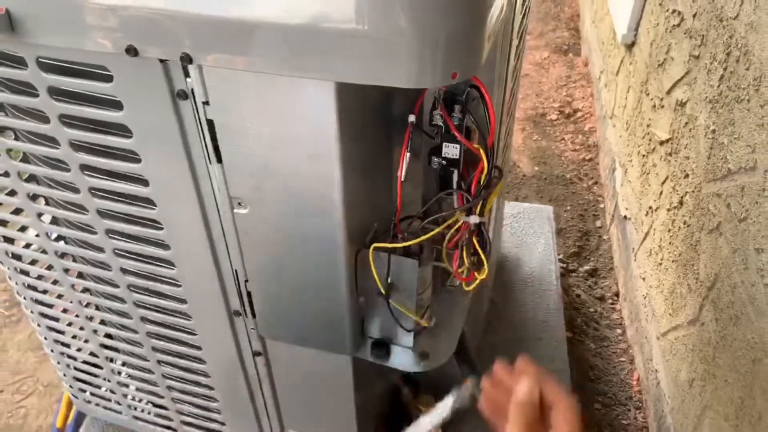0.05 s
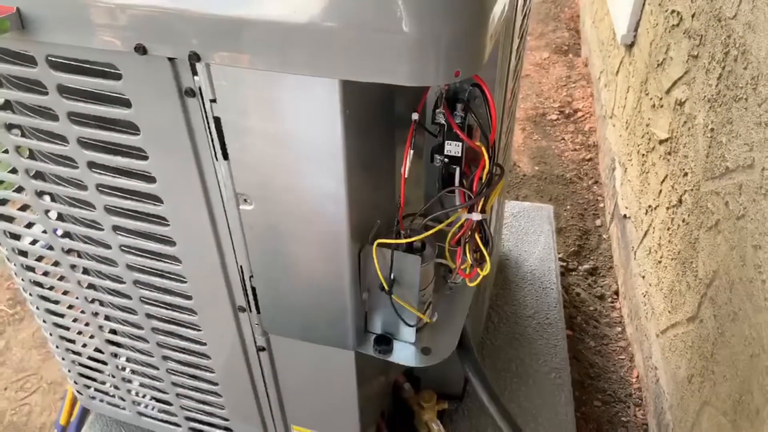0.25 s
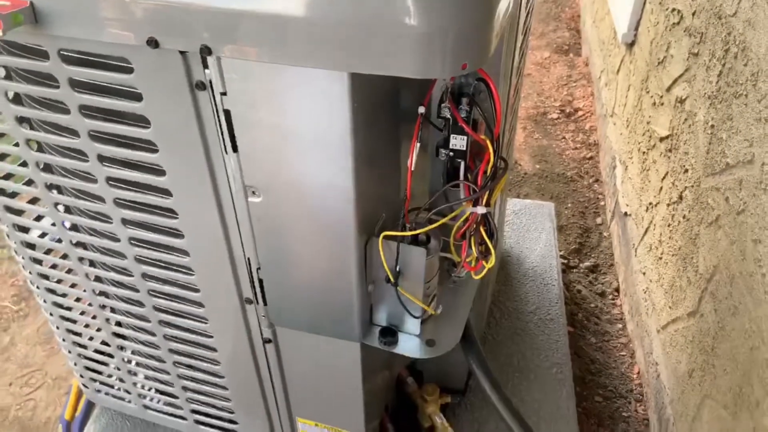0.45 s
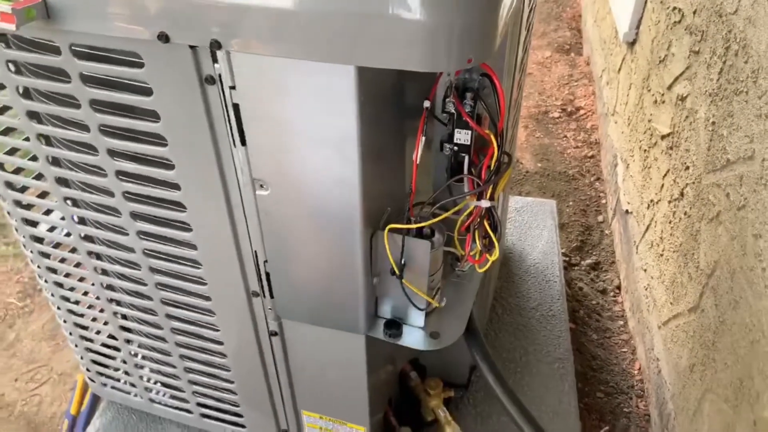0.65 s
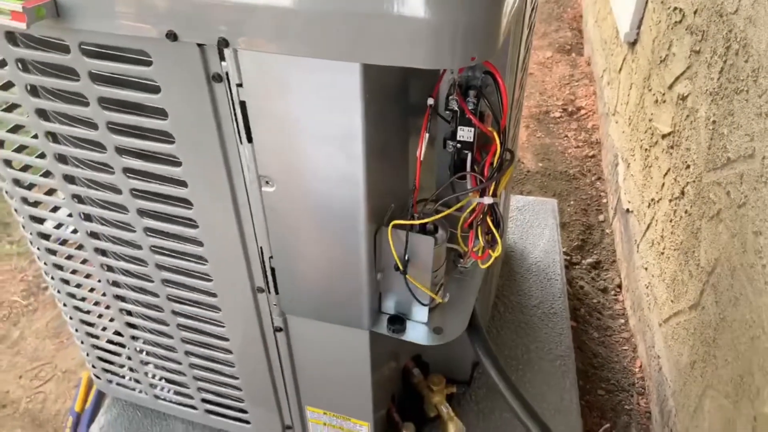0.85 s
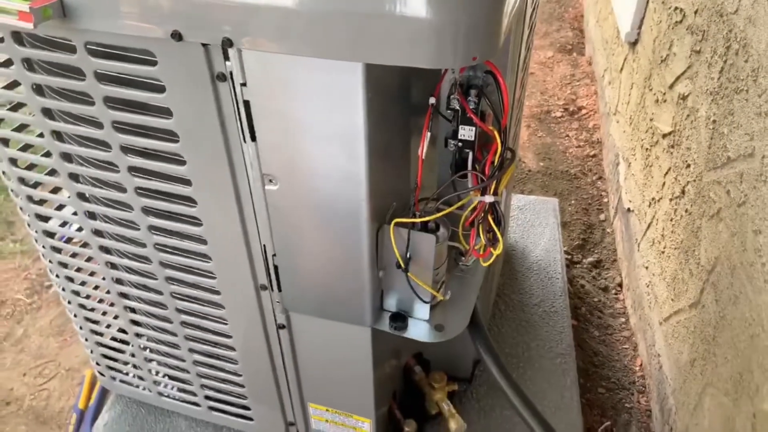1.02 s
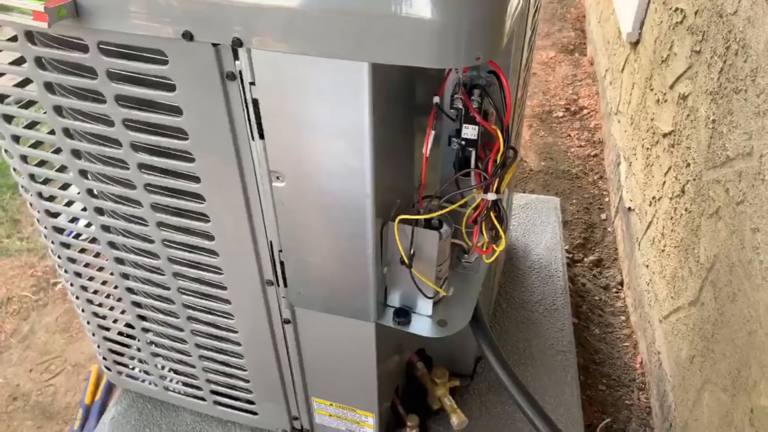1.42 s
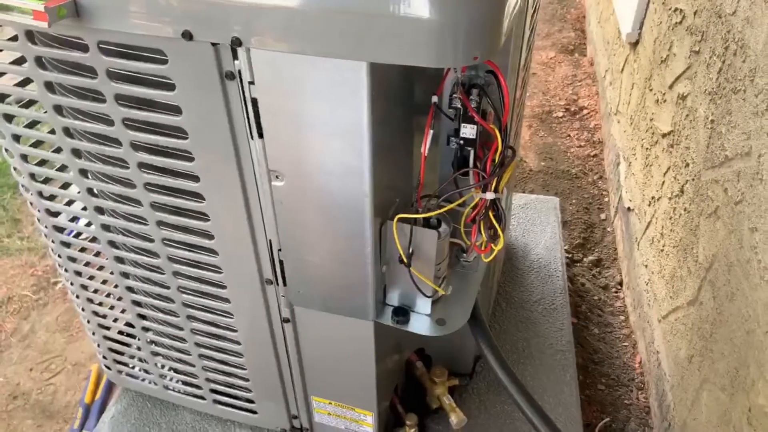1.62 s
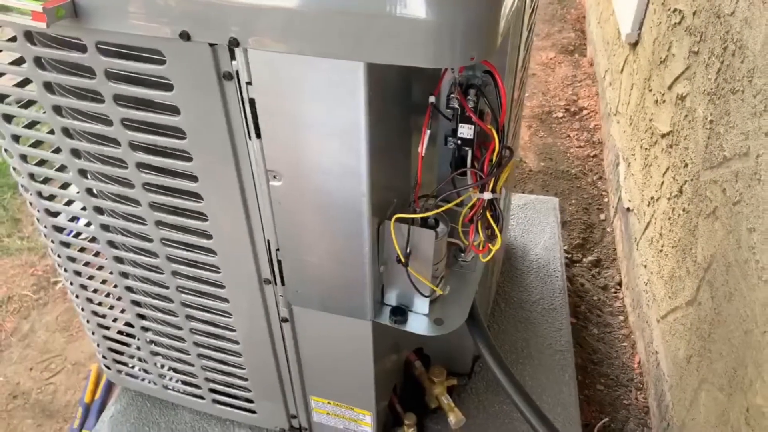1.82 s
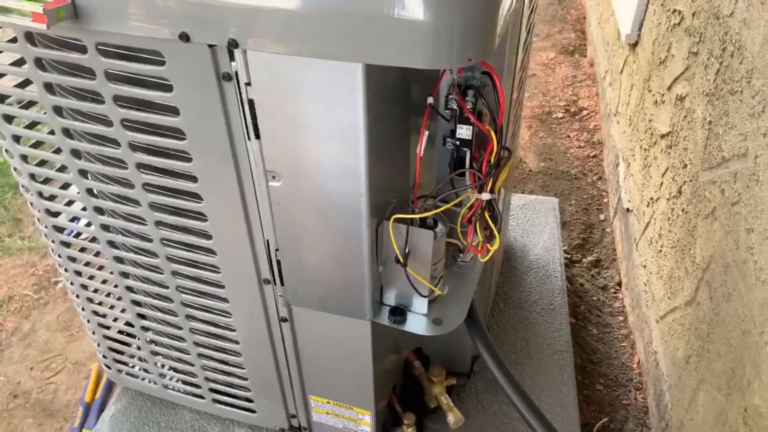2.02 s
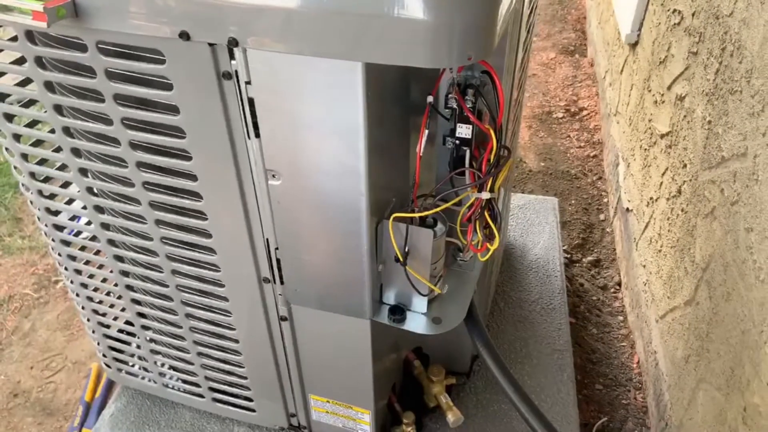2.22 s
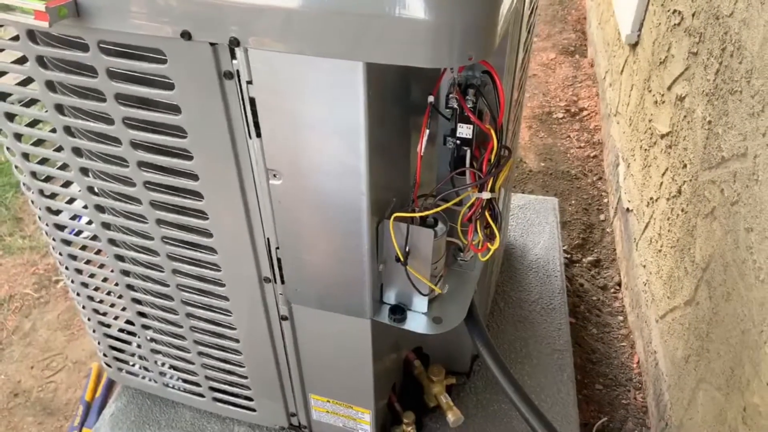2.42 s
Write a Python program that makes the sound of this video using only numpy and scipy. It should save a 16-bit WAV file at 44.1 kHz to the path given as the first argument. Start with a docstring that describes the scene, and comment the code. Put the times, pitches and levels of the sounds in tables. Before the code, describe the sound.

A single sharp clunk sounds close by at the metal panel of an outdoor air conditioner, amid a soft swish of clothing. Then faint birds whistle over a low rumble of distant traffic.

```python
"""A clunk at an air conditioner's service panel

A light knock at the open panel of an outdoor unit leads into a quick run of hard contacts, which
excite the damped modes of its metal parts and cabinet. Clothing swishes by friction as someone draws
back. Behind are a low traffic rumble, birds' long falling notes and a faint high whistling."""
import sys
import numpy as np
from scipy import signal
from scipy.fft import rfft, irfft
from scipy.io import wavfile

SR = 44100
rng = np.random.default_rng(int(sys.argv[2]) if len(sys.argv) > 2 else 0)


def waveform_to_disk(signal):
    """Save audio, clipped to [-1, 1], as 16-bit WAV at the path in sys.argv[1]."""
    frames = np.transpose(np.atleast_2d(signal))
    scaled = np.clip(frames, -1, 1) * 32767
    samples = np.round(scaled).astype(np.int16)
    wavfile.write(sys.argv[1], SR, samples)


N = 112454
T = np.arange(N) / SR

# The contacts of the clunk. Each row: time in seconds, then cabinet, metal and crack levels in dB.
CONTACTS = [(0.2693, -42.5, -64, -39), (0.2743, -51, -55, -39), (0.2783, -31, -36, -31.5),
            (0.2820, -28.5, -29.5, -37), (0.2845, -31.5, -23.5, -42), (0.2879, -50, -32, -46),
            (0.2916, -30.5, -47, -58), (0.2963, -46, -50, -57), (0.3032, -50, -57, -40.5),
            (0.3150, -50, -57, -58), (0.3227, -43, -59, -53)]


def from_db(db):
    """Amplitude grows tenfold for every 20 decibels."""
    return 10 ** (np.asarray(db) / 20)


def rms_one(x):
    """Dividing by the rms gives a signal unit power."""
    return x / np.sqrt(np.mean(x ** 2) + 1e-20)


def in_time(rows):
    """Linear interpolation turns timed rows into one continuous curve per column."""
    times, *columns = np.transpose(rows)
    return [np.interp(T, times, column) for column in columns]


def noise(spectrum):
    """Spectral shaping colours white noise; the result has unit rms."""
    hz, db = np.transpose(spectrum)
    bin_hz = np.maximum(np.arange(N // 2 + 1) * SR / N, 1)
    gain = from_db(np.interp(np.log(bin_hz), np.log(hz), db))
    return rms_one(irfft(rfft(rng.standard_normal(N)) * gain, N))


def drift(corner_hz):
    """Low-pass filtering makes noise a smooth random fluctuation of unit rms."""
    bin_hz = np.arange(N // 2 + 1) * SR / N
    return rms_one(irfft(rfft(rng.standard_normal(N)) / (1 + (bin_hz / corner_hz) ** 2), N))


def decay(start, t60):
    """Damped vibration starts suddenly and falls exponentially, by 60 dB in t60 seconds."""
    return (T >= start) * np.exp(-np.log(1000) * np.maximum(T - start, 0) / t60)


def swell(start, length):
    """A half-sine envelope gives a rounded rise and fall."""
    return np.sin(np.pi * np.clip((T - start) / length, 0, 1))


def strike(times, levels_db, modes, spread_db):
    """Modal superposition: every impulse drives every mode, and the modes add with alternating sign."""
    ringing = np.zeros(N)
    for k, (hz, db, t60) in enumerate(modes):
        scatter_db = spread_db * rng.standard_normal(len(times))
        impulses = np.zeros(N)
        impulses[(times * SR).astype(int)] = from_db(levels_db + db + scatter_db)
        radius = np.exp(-np.log(1000) / (t60 * SR))
        angle = 2 * np.pi * hz / SR
        feedback = [1, -2 * radius * np.cos(angle), radius * radius]
        ringing += (-1) ** k * signal.lfilter([0, np.sin(angle)], feedback, impulses + 1e-18)
    return ringing


def clunk_ring():
    """Impacts set the sheet-metal cabinet and small metal parts ringing at their natural frequencies."""
    # Each row: mode frequency in Hz, relative level in dB, time to fall 60 dB in seconds.
    cabinet_modes = [(137.6, -11, 0.19), (238.4, 2, 0.069), (277, -11, 0.0079), (315, -11, 0.055),
                     (370, -9, 0.028), (431.5, -4.5, 0.042), (511, -9, 0.06), (592, -9, 0.065),
                     (654, -19, 0.049)]
    metal_modes = [(803, -23, 0.076), (947, -6, 0.033), (1040, -5.5, 0.047), (1260, -17, .03),
                   (1440, -11, 0.04), (1538, -17, 0.05), (1710, -13, 0.02), (2002, -3.5, 0.028),
                   (2122, -2, 0.026), (2275, -8, 0.037), (2650, -9, 0.036), (2968, -4, 0.025),
                   (3190, -6.5, 0.013), (3950, -23, 0.027), (4610, -24, 0.049), (5300, -18, 0.035),
                   (7100, -25, 0.02), (7000, -16, 0.024)]
    times, cabinet_db, metal_db, _ = np.transpose(CONTACTS)
    cabinet = strike(times, cabinet_db, cabinet_modes, spread_db=1.5)
    return cabinet + strike(times, metal_db, metal_modes, spread_db=0)


def clunk_cracks():
    """A brief force has a broad spectrum, so each hard contact gives a burst of noise."""
    # Each row: frequency in Hz, relative spectral density in dB.
    crack_spectrum = [(600, 6), (1300, -2.5), (2000, 1.5), (3000, 2.5), (3600, -1.5), (5000, -5.5),
                      (8000, -5.5), (11000, -15), (15500, -33)]
    envelope = sum(from_db(db) * decay(start, t60=0.028) for start, _, _, db in CONTACTS)
    return noise(crack_spectrum) * envelope


def cabinet_thump():
    """A heavily damped low mode thumps, and the panels' shudder builds as it dies away."""
    # The shudder. Each row: frequency in Hz, relative spectral density in dB.
    shudder_spectrum = [(30, 3), (65, 5), (110, -8), (136, 8.5), (175, 4), (230, -4), (330, -7.5),
                        (800, -46)]
    thump_s, thump_hz, rise_s, thump_t60_s = 0.2858, 86, 0.0011, 0.047
    age = np.maximum(T - thump_s, 0)
    envelope = (1 - np.exp(-age / rise_s)) * decay(thump_s, thump_t60_s)
    thump = -from_db(-18) * np.sin(2 * np.pi * thump_hz * age) * envelope
    shudder_s = 0.292
    shudder_envelope = decay(shudder_s, t60=0.16) - decay(shudder_s, thump_t60_s)
    return thump + from_db(-27.5) * noise(shudder_spectrum) * shudder_envelope


def clunk_snap():
    """The hardest impact radiates a sharp transient, strongest in the upper midrange."""
    # Each row: frequency in Hz, relative spectral density in dB.
    snap_spectrum = [(500, -6), (1000, 0), (1350, 1), (1650, -8), (2100, 6), (2450, -1), (2950, 3.5),
                     (3350, -2), (3800, -17), (8000, -33)]
    return from_db(-24.5) * noise(snap_spectrum) * decay(start=0.2841, t60=0.028)


def rattle():
    """Collisions of loose parts, too dense to hear singly, merge into decaying noise."""
    # Each row: frequency in Hz, relative spectral density in dB.
    rattle_spectrum = [(150, 6), (230, -11), (430, -5), (700, -2.5), (1000, -6), (1500, -16), (2100, -6.5),
                       (2450, -11), (3000, -12.5), (4000, -18.5), (8000, -20.5), (15000, -39)]
    return from_db(-36) * noise(rattle_spectrum) * decay(start=0.284, t60=0.18)


def knock():
    """A light impact before the clunk: a bright tick sounds at once, a dull body builds more slowly."""
    # Each row: frequency in Hz, relative spectral density in dB.
    tick_spectrum = [(800, -5), (1500, -6), (2000, -5), (2650, 2), (3300, -7), (3900, 0), (4700, -28),
                     (12000, -36)]
    body_spectrum = [(60, 4.5), (140, 5), (200, -7), (370, 5), (500, -9), (640, 0), (850, -8), (1400, -8),
                     (1800, -14), (2900, -22), (4100, -27), (12000, -43)]
    start_s, rise_s = 0.2424, 0.0069
    tick = from_db(-44.5) * noise(tick_spectrum) * decay(start_s, t60=0.055)
    rise = 1 - np.exp(-np.maximum(T - start_s, 0) / rise_s)
    return tick + from_db(-25.5) * noise(body_spectrum) * rise * decay(start_s, t60=0.071)


def clothing():
    """Sliding friction makes noise: a dull shuffle fades into a bright swish over low rubbing."""
    # The envelope of the slide. Each row: time in seconds, level in dB.
    slide_levels = [(0, -62.5), (.10, -60), (.135, -54), (.23, -52.5), (.33, -54), (.42, -53), (.5, -55.5),
                    (.56, -57.5), (.59, -61.5), (.68, -63), (.76, -73), (.86, -80), (.95, -92)]
    # Each row: frequency in Hz, relative spectral density in dB.
    swish_spectrum = [(200, -1.5), (450, 3.5), (600, 0.5), (760, 12), (900, 1), (1450, 6.5), (1800, -3.5),
                      (2100, 6), (2520, 1.5), (2850, 3.5), (3850, -2), (4750, 1), (5250, -2.5),
                      (5950, -2.5), (6400, 4), (6900, -2.5), (7400, -5), (8080, 1), (8500, -1), (9700, -1),
                      (10200, 3), (10700, -1), (11100, -1.5), (12050, -5.5), (12800, -15), (14300, -15),
                      (15500, -29)]
    rubbing_spectrum = [(20, -5), (40, 5), (70, 9.5), (130, -11), (200, -16.5), (400, -12), (1000, -23),
                        (3000, -63)]
    shuffle_spectrum = [(100, -6), (350, 4.5), (600, -6.5), (1400, -10.5), (2500, -11), (6000, -34)]
    grain_db = 1
    slide_db, = in_time(slide_levels)
    swish = noise(swish_spectrum) * from_db(grain_db * drift(300))
    rubbing = from_db(4) * noise(rubbing_spectrum)
    shuffle = from_db(-51) * noise(shuffle_spectrum) * decay(start=0, t60=0.79)
    return from_db(slide_db) * (swish + rubbing) + shuffle


def cloth_scrapes():
    """Where the cloth catches, fast amplitude modulation makes its friction noise gritty."""
    # Each row: start in seconds, length in seconds, level in dB.
    catches = [(0.121, 0.044, -59.5), (0.389, 0.023, -62), (0.408, 0.013, -52.5), (0.436, 0.032, -56)]
    # Each row: frequency in Hz, relative spectral density in dB.
    scrape_spectrum = [(600, -6), (1500, -4.5), (2150, 1), (2500, -3), (2950, 2.5), (3800, -9), (8000, -30),
                       (14000, -40)]
    grain_db = 3.5
    grit = rms_one(noise(scrape_spectrum) * from_db(grain_db * drift(400)))
    return grit * sum(from_db(db) * swell(start, length) for start, length, db in catches)


def bird_notes():
    """Birds' whistles glide, mostly downward, and flutter; overlapping notes beat by interference."""
    # Each row: start and length in seconds, first and last pitch in Hz, pitch arch in Hz, level in dB.
    notes = [(1.24, 0.38, 3628, 3360, 10.5, -66.5), (1.438, .13, 3412, 3310, 2, -63.5),
             (1.497, 0.23, 3336, 3190, 1, -68), (1.801, 0.07, 3485, 3530, 12, -68),
             (1.875, 0.059, 3530, 3410, -1.5, -63.5), (1.931, .15, 3480, 3400, -2, -68.5),
             (1.952, 0.21, 3420, 3195, 1, -70.5), (2.309, .23, 3504, 3410, 14.5, -68.5),
             (2.397, .25, 3400, 3200, 3, -71), (1.27, .28, 2725, 2450, 29, -78),
             (1.851, .26, 2660, 2463, -10.5, -79), (1.60, .065, 7700, 7750, 34, -74),
             (1.875, 0.097, 7900, 7700, 60, -77.5), (2.082, 0.055, 8000, 7950, 153, -76)]
    waver_hz, flutter_db, octave_db = 26, 3, -17.5
    song = np.zeros(N)
    for start, length, first_hz, last_hz, arch_hz, db in notes:
        progress = np.clip((T - start) / length, 0, 1)
        arch = swell(start, length)
        glide_hz = first_hz + (last_hz - first_hz) * progress + arch_hz * arch
        phase = 2 * np.pi * np.cumsum(glide_hz + waver_hz * drift(64.4)) / SR
        tone = np.sin(phase) + from_db(octave_db) * np.sin(2 * phase)
        song += from_db(db + flutter_db * drift(58)) * arch * tone
    return song


def bird_chirp():
    """A frequency sweep opens the song: one short whistle swells as it rises, then tips over."""
    # Each row: time in seconds, frequency in Hz, level in dB.
    contour = [(1.13, 3670, -84), (1.165, 3880, -75), (1.195, 4240, -65), (1.22, 4345, -71),
               (1.25, 4220, -68), (1.27, 4000, -84)]
    waver_hz = 26
    hz, db = in_time(contour)
    phase = 2 * np.pi * np.cumsum(hz + waver_hz * drift(62)) / SR
    return from_db(db) * np.sin(phase) * (T > contour[0][0]) * (T < contour[-1][0])


def high_whistle():
    """Random frequency and amplitude modulation unsettle a thin tone wandering in the high treble."""
    # Each row: time in seconds, frequency in Hz, level in dB.
    contour = [(1.17, 10200, -92), (1.21, 11200, -79), (1.25, 11800, -79), (1.32, 10200, -78),
               (1.37, 9000, -99), (1.47, 8200, -85), (1.54, 8740, -83), (1.58, 10200, -87),
               (1.65, 10340, -75), (1.74, 9700, -81), (1.80, 11100, -86), (1.85, 11240, -86),
               (1.89, 9800, -80), (1.98, 8600, -95)]
    waver_hz, flicker_db = 70, 4.5
    hz, db = in_time(contour)
    phase = 2 * np.pi * np.cumsum(hz + waver_hz * drift(150)) / SR
    sounding = (T > contour[0][0]) * (T < contour[-1][0])
    return from_db(db + flicker_db * drift(45)) * np.sin(phase) * sounding


def far_tone():
    """A faint, distant tone comes and goes, wavering by random frequency modulation."""
    pitch_hz, waver_hz = 1717, 20
    phase = 2 * np.pi * np.cumsum(pitch_hz + waver_hz * drift(40)) / SR
    return from_db(-81.5) * swell(start=1.2, length=0.8) * np.sin(phase)


def wall_echoes(direct):
    """Delayed reflections from nearby walls interfere with the direct sound."""
    # Each row: delay in seconds, level relative to the direct sound in dB.
    reflections = [(.011, -7), (.029, -10)]
    return direct + sum(from_db(db) * np.interp(T - delay, T, direct, left=0) for delay, db in reflections)


def outdoors():
    """Stationary noise forms the background: far traffic rumbles under a soft, even hiss."""
    # Each row: frequency in Hz, relative spectral density in dB.
    rumble_spectrum = [(15, -28), (30, -4), (45, 1), (56, -2), (80, -1), (105, -9.5), (135, -14),
                       (200, -30), (400, -83)]
    hiss_spectrum = [(40, -9.5), (90, -1.5), (140, 1.5), (200, -1), (255, -4.5), (320, -2.5), (400, -6),
                     (600, -10), (800, -8.5), (1000, -9), (1350, -15), (1700, -16), (2250, -20.5),
                     (2650, -19), (3100, -20), (4200, -26), (6300, -27.5), (10000, -33), (12200, -37.5),
                     (13500, -47), (15500, -49)]
    return from_db(-50) * noise(rumble_spectrum) + from_db(-59.5) * noise(hiss_spectrum)


def scene():
    """Superposition: the pressures of all sources add at one microphone."""
    distant = wall_echoes(bird_chirp() + bird_notes() + far_tone())
    background = distant + high_whistle() + outdoors()
    panel = knock() + clunk_ring() + clunk_cracks() + cabinet_thump() + clunk_snap() + rattle()
    return (panel + clothing() + cloth_scrapes() + background)[None]


def record(dry):
    """Soft saturation rounds the highest peaks, and a steep low-pass filter limits the bandwidth."""
    ceiling, cutoff_hz = 0.165, 15450
    rounded = ceiling * np.tanh(dry / ceiling)
    return signal.sosfilt(signal.ellip(10, 0.1, 80, cutoff_hz, fs=SR, output="sos"), rounded)


dry = scene()
out = record(dry)
waveform_to_disk(out)
```